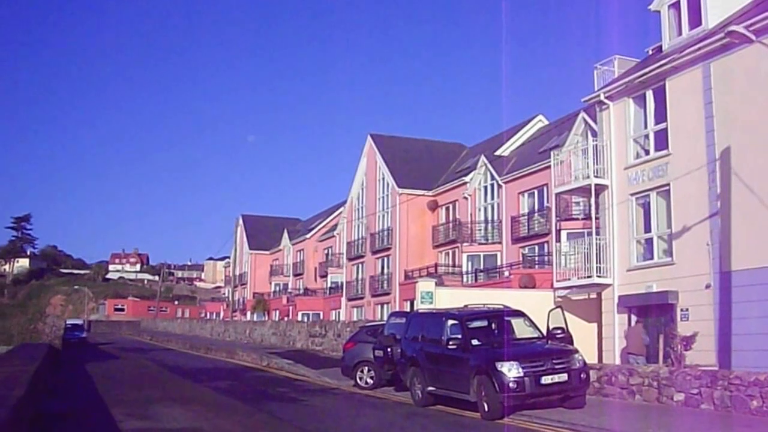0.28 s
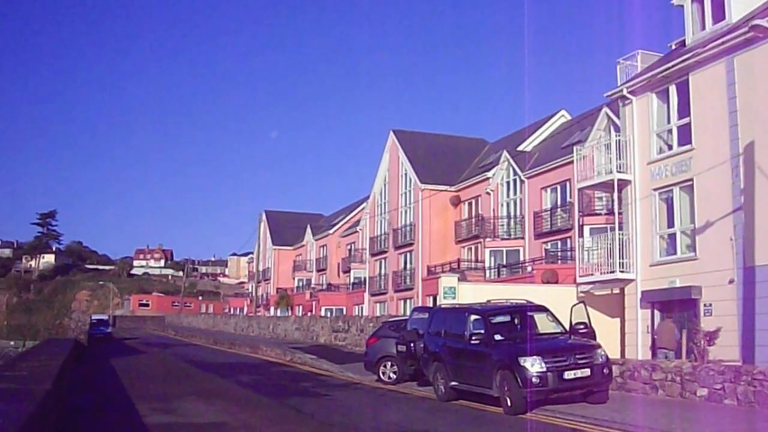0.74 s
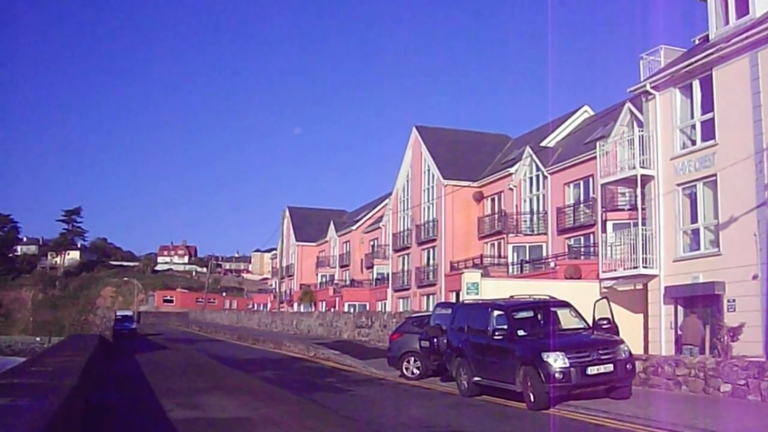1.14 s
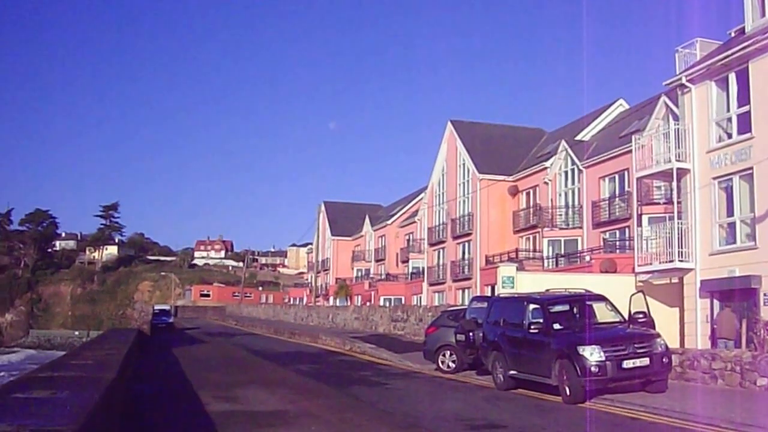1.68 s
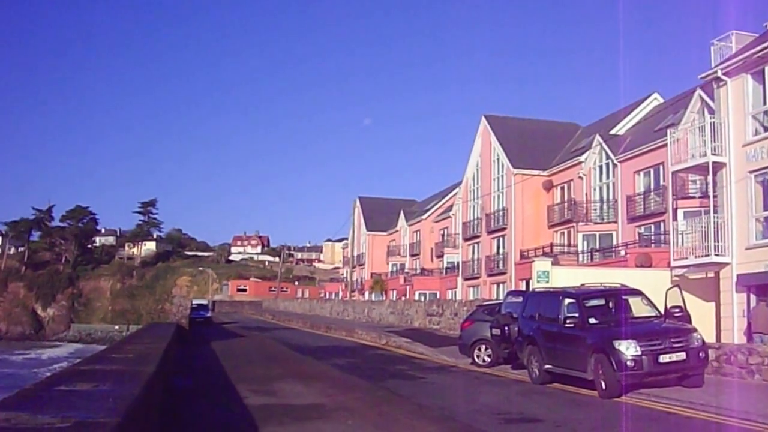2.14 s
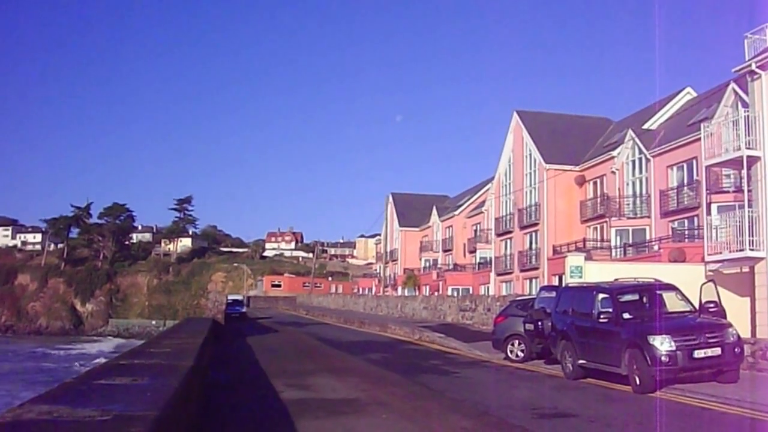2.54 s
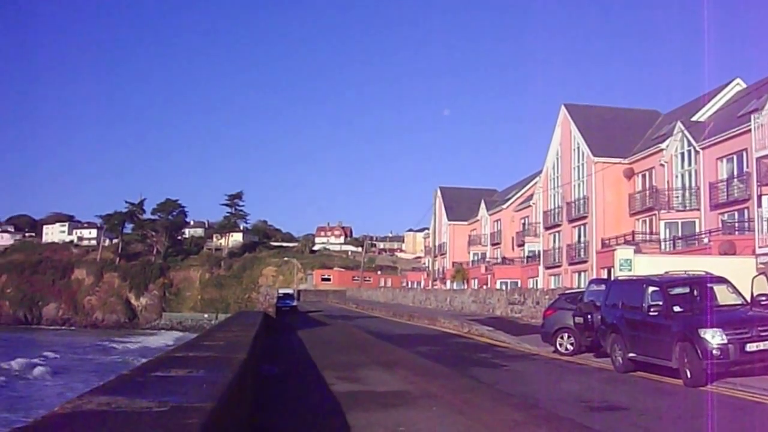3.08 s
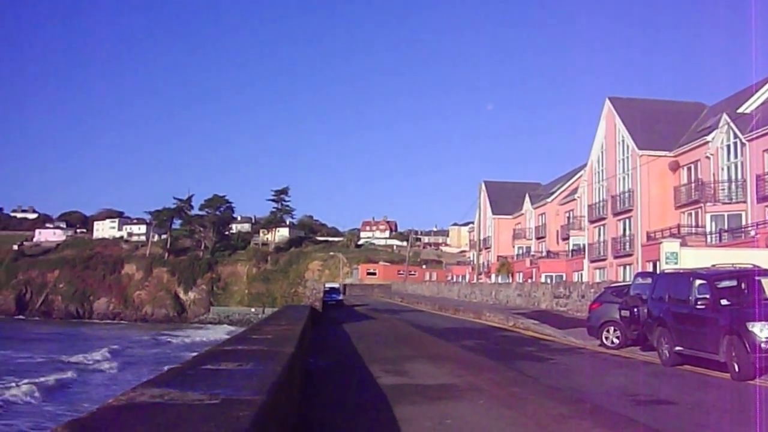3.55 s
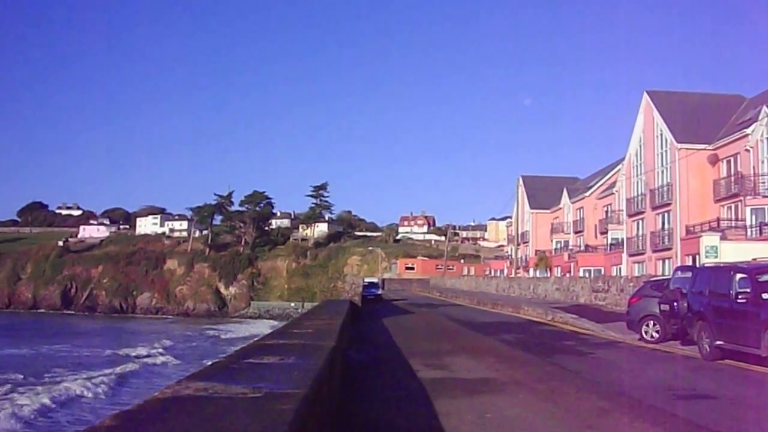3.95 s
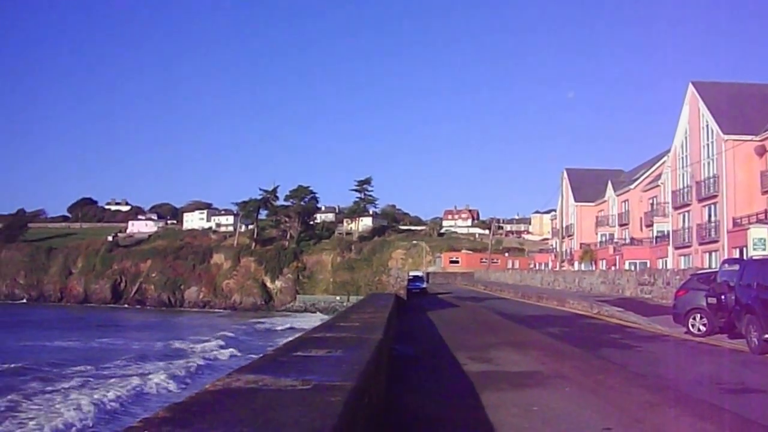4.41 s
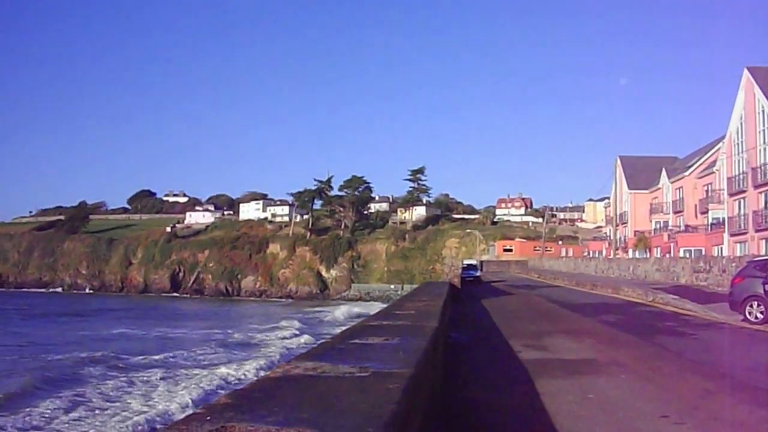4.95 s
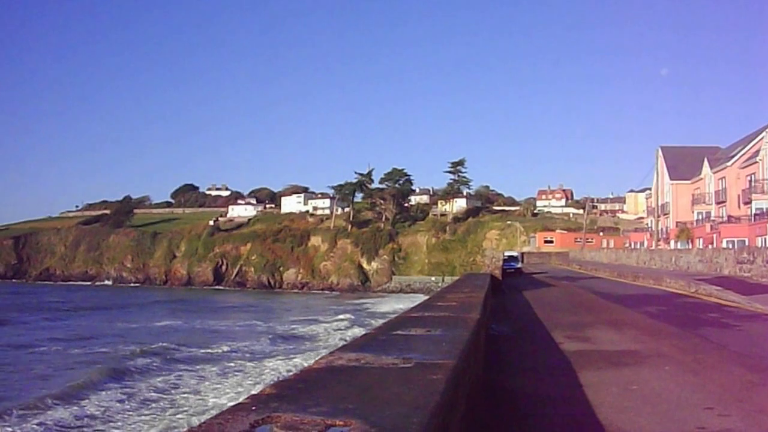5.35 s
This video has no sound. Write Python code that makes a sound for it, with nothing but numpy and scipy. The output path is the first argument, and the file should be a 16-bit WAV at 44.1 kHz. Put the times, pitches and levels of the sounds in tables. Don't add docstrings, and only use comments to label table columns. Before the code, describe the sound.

Rough sea breaks continuously below a wall, a dense low roar with soft spray hiss. Loud plastic clicks and one overloading knock come in the first two thirds of a second, from a finger on a small hand-held camera. Wind rumbles throughout, with a thumping blast at about three seconds; the surf is slightly fuller midway, then eases. Dull treble, open air.

```python
import sys
import numpy as np
from scipy import signal
from scipy.fft import rfft, irfft, next_fast_len
from scipy.io import wavfile

SR = 44100
rng = np.random.default_rng(int(sys.argv[2]) if len(sys.argv) > 2 else 0)


def generate_wav(signal):
    frames = np.transpose(np.atleast_2d(signal))
    scaled = np.clip(frames, -1, 1) * 32767
    pcm = np.round(scaled).astype(np.int16)
    wavfile.write(sys.argv[1], SR, pcm)


def volts(x):
    e = np.asarray(x, float) / 20
    return 10 ** e


N = 246736

# (time [s], roar level [dB], spray hiss level [dB])
SEA_LEVELS = [
    (0.4, -26, -39),
    (0.78, -25, -38),
    (2.24, -23, -37),
    (2.84, -23, -37),
    (3.13, -22, -36),
    (4.03, -23, -36),
    (5.21, -25, -37),
    (5.59, -25, -37),
]
# (time [s], level [dB])
BREEZE = [
    (0.4, -30),
    (1.4, -31),
    (2.0, -31.5),
    (2.8, -31),
    (2.96, -26),
    (3.08, -25),
    (3.5, -31),
    (4.2, -32),
    (5.5, -32.5),
]
# (frequency [Hz], density [dB per Hz])
ROAR_SPECTRUM = [(80, -25), (140, -7), (190, -3), (242, -2), (314, 0), (476, -4), (825, -5), (1300, -13),
                 (1800, -27), (2600, -60)]
# (frequency [Hz], density [dB per Hz])
SPRAY_SPECTRUM = [(760, -30), (1300, -6), (1600, -7), (1850, -7), (2360, -6), (2670, -13), (3130, -18),
                  (3770, -12), (4170, -18), (4900, -18.5), (5550, -30), (6000, -30.5), (6400, -38),
                  (7200, -55), (8200, -90)]
# (frequency [Hz], density [dB per Hz])
RUMBLE_SPECTRUM = [(5, -20), (9, 0), (18, 2), (30, 0), (70, 0), (140, -1), (200, -7), (400, -28),
                   (800, -60)]
# (time [s], level above it [dB])
GUSTS_ON_BREEZE = [(.76, 3), (1.17, 2), (1.35, 4), (1.77, 3), (2.1, 7), (2.26, 5), (2.36, 2), (2.63, 4),
                   (2.71, 3), (2.875, 7), (3.17, 4), (3.33, 6), (3.57, 5), (3.74, 4), (3.99, 5), (4.13, 8),
                   (4.24, 6), (4.4, 5), (4.65, 7), (4.85, 3), (5.49, 4), (5.59, 9)]
# (time [s], peak level [dB], swing [Hz], t60 [s], direction [+1 or -1])
EDDY_SLAPS = [(.2808, -9, 290, .03, -1), (.3376, -2, 210, .011, 1), (.76, -13, 40, .05, -1),
              (2.86, -15, 70, .06, 1), (2.885, -10, 60, .05, 1), (2.968, -6, 36, .13, 1),
              (3.0408, -3, 170, .018, 1), (3.0438, -8, 430, .014, -1), (3.0512, -12, 90, .02, 1),
              (3.0568, 4, 115, .017, -1), (3.09, -12, 70, .04, -1), (3.144, -6, 32, .04, -1),
              (3.168, -12, 18, .12, 1), (3.1752, 3, 200, .007, 1), (3.322, -10, 50, .06, -1)]
# (time [s], peak level [dB], frequency [Hz], t60 [s], direction [+1 or -1])
CASE_MODES = [(.1789, -4, 1420, .0025, 1), (.1804, -18, 1415, .022, 1), (.1792, -19, 2300, .002, -1),
              (.1804, -19, 2780, .01, 1), (.3395, 3, 2750, .0009, -1), (.3396, -15, 4900, .003, -1),
              (.34, -20, 5800, .003, -1), (.3401, -15, 1420, .005, -1), (.34, -16, 3600, .003, -1),
              (.3406, -17, 2650, .011, 1), (.3425, -26, 3700, .008, 1), (.6344, -10, 950, .007, 1),
              (.63405, -9, 1700, .004, -1), (.63475, -7, 2300, .0035, -1), (.6355, -18, 3500, .004, 1),
              (.637, -23, 2350, .018, 1), (.6192, -15, 1100, .005, 1), (.6195, -30, 3700, .004, 1),
              (.6443, -32, 3400, .006, 1), (5.5328, -15, 760, .014, 1), (3.056, -4, 720, .007, 1)]
# (time [s], peak level [dB], t60 [s])
BRITTLE_CRACKS = [
    (.3394, -11, .006),
    (.3425, -31, .006),
    (.6346, -17, .008),
    (.6435, -29, .015),
]
# (time [s], peak level [dB], fall [s], after-pull level [dB], after-pull fall [s])
MEMBRANE_KNOCK = (.31166, 20, .00028, -5.5, .002)

GUST_RISE_S, GUST_FALL_S = .06, .05
GUST_CAP_DB = -25
CASE_CUT_HZ, CLICK_CUT_HZ = 5200, 6300
CAPSULE_TOP, CONVERTER_TOP = 1.05, .96
START_S, FADE_S, OFFSET = .0284, .025, -.0134
TOP_CUT_HZ, HISS_DB = 8100, -97


def in_time(rows):
    s, *columns = np.transpose(rows)
    return [np.interp(np.arange(N) / SR, s, c) for c in columns]


def rms_one(x):
    return x / np.sqrt(np.mean(x ** 2) + 1e-20)


def drift(rate):
    pole = np.exp(-80 * np.pi * rate / SR)
    white = rng.standard_normal(N // 40 + 2002)
    slow = signal.lfilter([1], [1, -2 * pole, pole * pole], white)[2000:]
    return np.interp(np.arange(N) / 40, np.arange(len(slow)), rms_one(slow))


def colour(x, spectrum):
    size = next_fast_len(N)
    hz, level_db = np.transpose(spectrum)
    bins_hz = np.arange(size // 2 + 1) * SR / size
    shape_db = np.interp(np.log(bins_hz + 1), np.log(hz), level_db)
    return rms_one(irfft(rfft(x, size) * volts(shape_db), size)[:N])


def churn(white, low_hz, count, shared_db, own_db, own_rate):
    out, together = 0, drift(6)
    for k in range(count):
        band_hz = low_hz * 2 ** (np.array([k, k + 1]) / 2)
        band_filter = signal.butter(2, band_hz, "band", fs=SR, output="sos")
        part = signal.sosfilt(band_filter, white[k % 2])
        out = out + part * volts(shared_db * together + own_db * drift(own_rate))
    return out


def splashes(per_s, spread_db):
    uneven = np.minimum(rng.exponential(1, (2, N)), 4)
    sizes = volts(spread_db * uneven) * rng.standard_normal((2, N))
    return sizes * (rng.random((2, N)) < per_s / SR)


def surf():
    roar_db, hiss_db = in_time(SEA_LEVELS)
    grains = splashes(9000, 1.5)
    roar = churn(grains, 80, count=10, shared_db=.6, own_db=.8, own_rate=8)
    foam = rng.standard_normal((2, N))
    hiss = churn(foam, 700, count=8, shared_db=.5, own_db=.6, own_rate=10)
    return volts(roar_db + .4) * colour(roar, ROAR_SPECTRUM) + volts(hiss_db + .7) * colour(hiss, SPRAY_SPECTRUM)


def gusting():
    t = np.arange(N) / SR
    swells = [db * np.interp(t - s, [-GUST_RISE_S, 0, GUST_FALL_S], [0, 1, 0]) for s, db in GUSTS_ON_BREEZE]
    return np.minimum(in_time(BREEZE)[0] + np.max(swells, axis=0), GUST_CAP_DB)


def ring(s, peak_db, hz, t60, way):
    out, t = np.zeros(N), np.arange(int(1.5 * t60 * SR)) / SR
    decay = volts(peak_db - 60 * t / t60)
    contact = 1 - np.exp(-3 * hz * t)
    swing = decay * np.sin(2 * np.pi * hz * t) * contact
    start = int(s * SR)
    out[start:start + len(t)] = np.sign(way) * swing[:N - start]
    return out


def wind():
    turbulence = rng.standard_normal((2, N))
    lumps = churn(turbulence, 8, count=11, shared_db=1.1, own_db=1.2, own_rate=7)
    slaps = sum(ring(s, db + 4, hz, t60, way) for s, db, hz, t60, way in EDDY_SLAPS)
    return volts(gusting() + .8) * colour(lumps, RUMBLE_SPECTRUM) + slaps


def crack(s, peak_db, t60):
    t = np.clip(np.arange(N) / SR - s, 0, 3 * t60)
    high_pass = signal.butter(2, 2500, "high", fs=SR, output="sos")
    bright = signal.sosfilt(high_pass, rng.standard_normal(N))
    return (t > 0) * volts(peak_db - 60 * t / t60) * bright


def membrane_knock():
    s, peak_db, fall, pull_db, creep = MEMBRANE_KNOCK
    t = np.arange(N) / SR - s
    after = np.clip(t, 0, 1)
    return (t > 0) * (volts(peak_db) * np.exp(-after / fall) + volts(pull_db) * np.exp(-after / creep))


def case():
    blows = sum(ring(s, db + 5, hz, t60, way) for s, db, hz, t60, way in CASE_MODES)
    blows += sum(crack(s, db, t60) for s, db, t60 in BRITTLE_CRACKS)
    click_cut = signal.butter(8, CLICK_CUT_HZ, fs=SR, output="sos")
    blows = signal.sosfilt(click_cut, blows) - membrane_knock()
    case_cut = signal.butter(4, CASE_CUT_HZ, fs=SR, output="sos")
    return signal.sosfilt(case_cut, blows)


def duck(x, threshold_db, release_db_s, depth):
    ramp = release_db_s * np.arange(N) / SR
    over = np.maximum(20 * np.log10(np.abs(x) + 1e-9) - threshold_db, 0)
    held = np.maximum.accumulate(over + ramp) - ramp
    return volts(-depth * signal.lfilter([.05], [1, -.95], held))


def scene():
    blows = case()
    background = surf() + wind()
    ducked = background * duck(blows, threshold_db=-4, release_db_s=750, depth=.55)
    return (ducked + blows)[None]


def band_limit(x):
    return signal.sosfilt(signal.butter(12, 16000, fs=SR, output="sos"), x)


def record(dry):
    capsule = np.clip(dry, -CAPSULE_TOP, CAPSULE_TOP)
    top_cut = signal.cheby2(12, 70, TOP_CUT_HZ, fs=SR, output="sos")
    dull = signal.sosfilt(top_cut, capsule)
    t = np.arange(N) / SR - START_S
    fade = np.clip(.2 + .8 * t / FADE_S, 0, 1)
    opened = (t > 0) * (fade * dull + OFFSET)
    clipped = np.clip(opened, -CONVERTER_TOP, CONVERTER_TOP)
    rounding = signal.butter(2, 12500, fs=SR, output="sos")
    finished = signal.sosfilt(rounding, clipped) + volts(HISS_DB) * rng.standard_normal(N)
    return band_limit(finished)


dry = scene()
out = record(dry)
generate_wav(out)
```